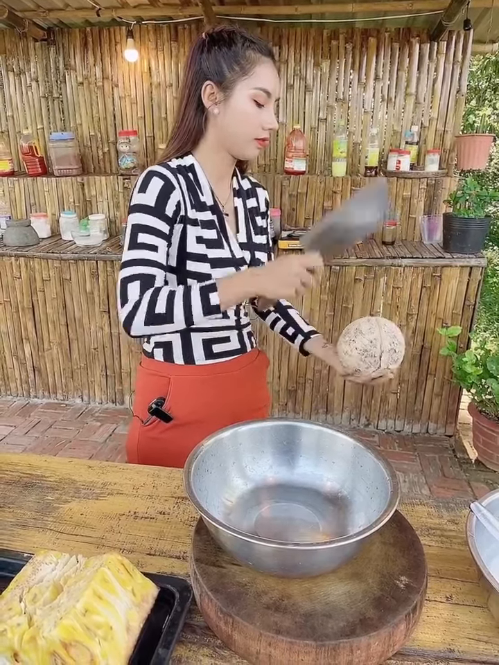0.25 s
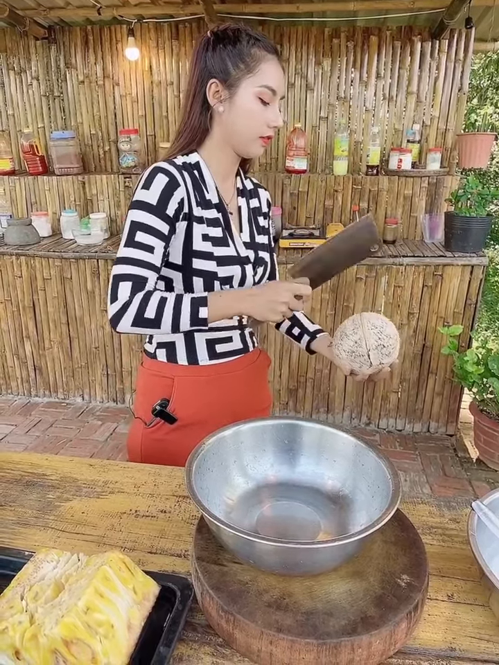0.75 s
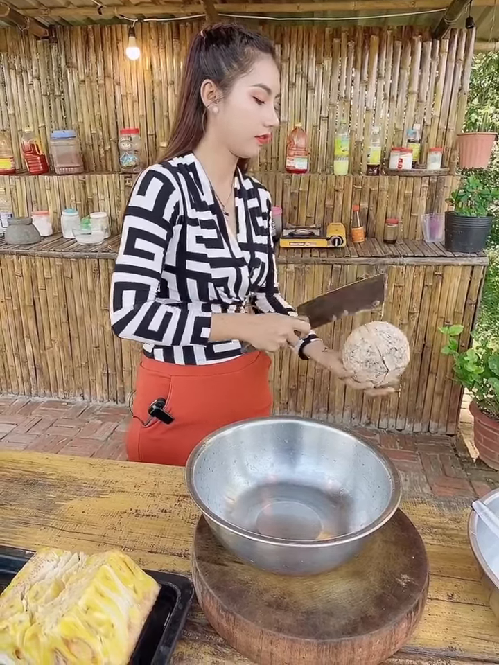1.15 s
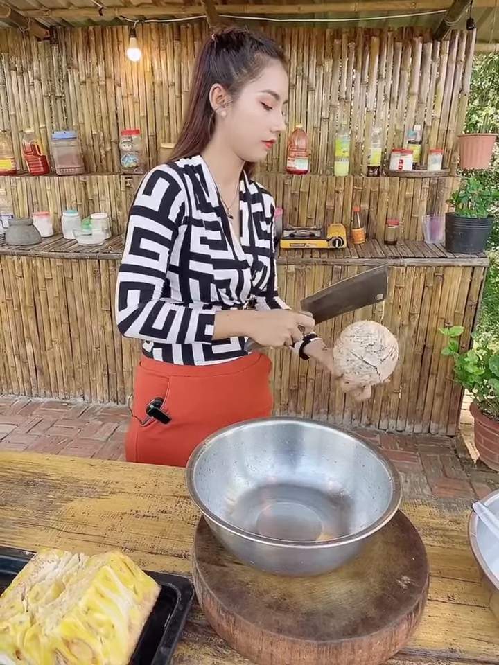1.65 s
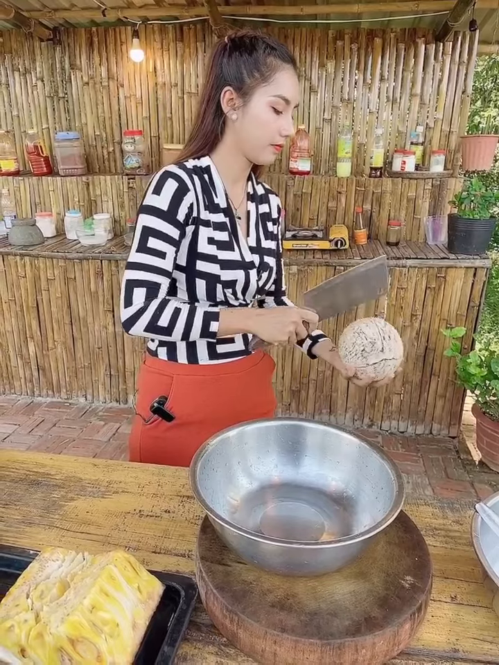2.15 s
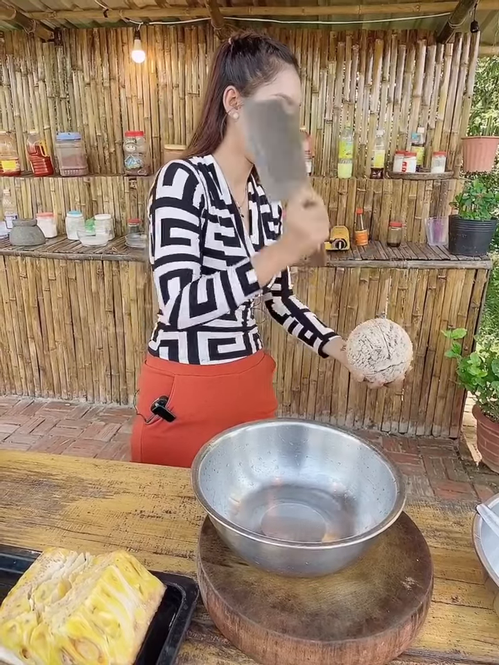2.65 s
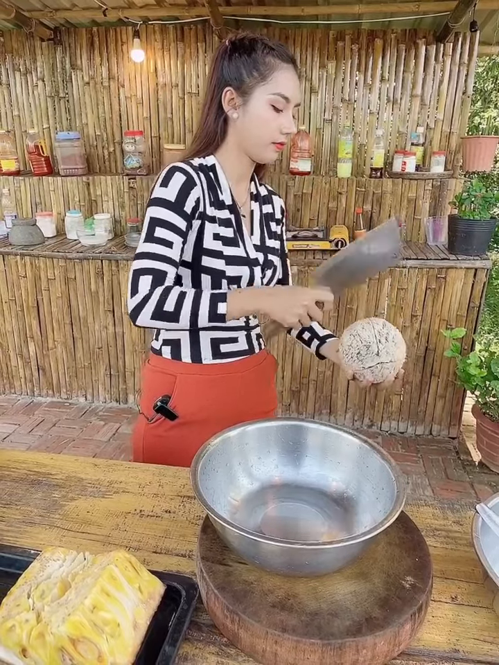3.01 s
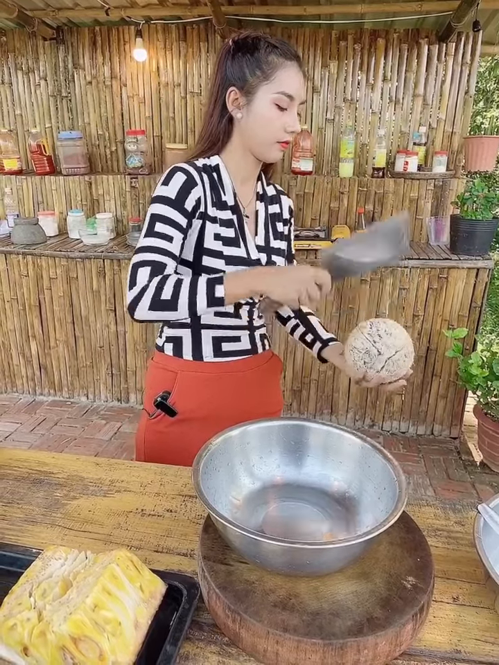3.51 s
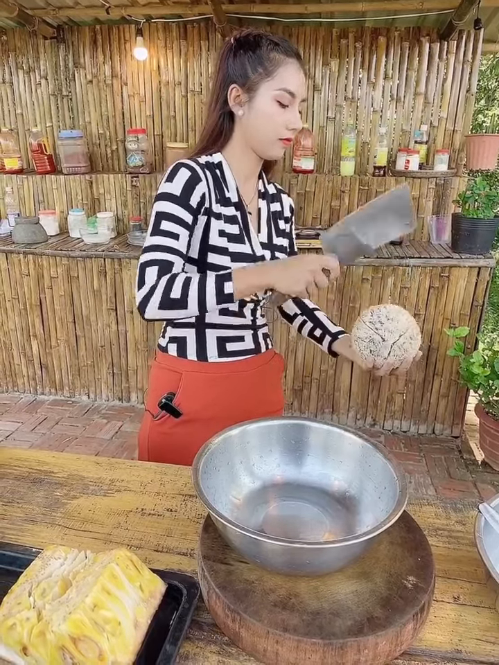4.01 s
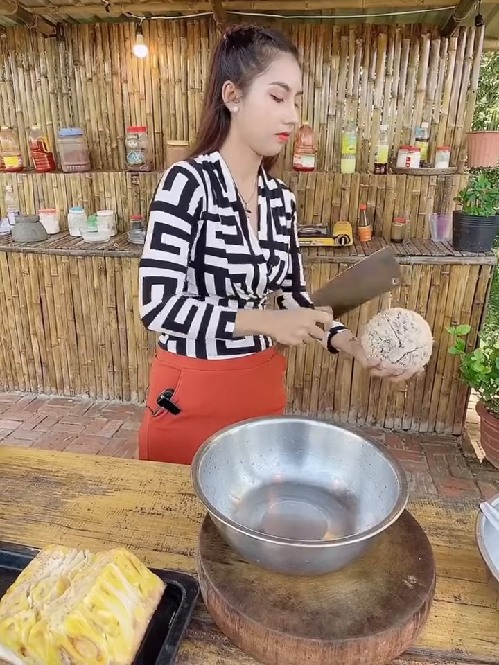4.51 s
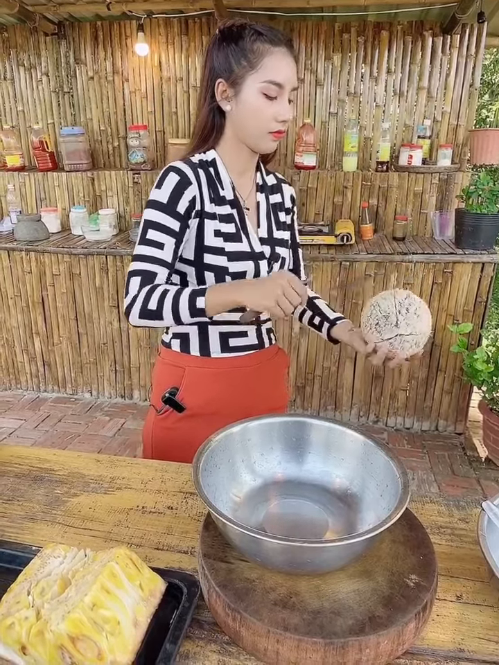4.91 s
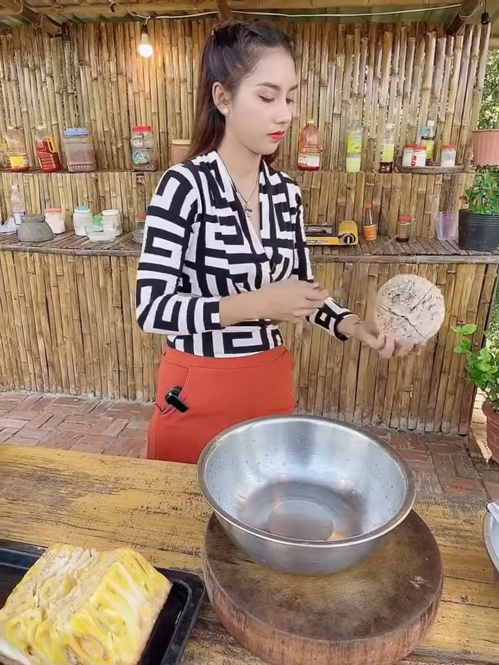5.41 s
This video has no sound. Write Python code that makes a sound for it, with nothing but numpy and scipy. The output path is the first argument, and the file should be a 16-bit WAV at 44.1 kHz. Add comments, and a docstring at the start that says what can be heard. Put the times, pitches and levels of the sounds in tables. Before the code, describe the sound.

A steel cleaver strikes a hand-held coconut six times with sharp, ringing knocks, while a chick peeps faintly in the background.

```python
"""Six sharp knocks with a metallic ring: the back of a steel cleaver strikes a husked, hand-held coconut.
Each blow knocks the shell, sets the blade ringing and echoes in the bamboo shelter of an open kitchen;
the hard ones overload the microphone. Between blows the water inside the nut gurgles, fingers tap
the shell and a chick peeps in the yard, over a faint hiss and a light breeze."""
import sys
import numpy as np
from scipy import signal
from scipy.fft import irfft
from scipy.io import wavfile
from scipy.ndimage import uniform_filter1d

SR = 44100
rng = np.random.default_rng(int(sys.argv[2]) if len(sys.argv) > 2 else 0)


def master_out(mix):
    """Clip the mix to full scale and print it as 16-bit PCM to the path in sys.argv[1]."""
    frames = np.transpose(np.atleast_2d(mix))
    ceiling = np.clip(frames, -1, 1)
    pcm = np.round(ceiling * 32767).astype(np.int16)
    wavfile.write(sys.argv[1], SR, pcm)


N = 249606

# the low rumble of air moving past the microphone: (frequency [Hz], level [dB])
WIND_SPECTRUM = [(10, -3.5), (28, -0.5), (50, -7.5), (90, -8.5), (140, -17), (220, -26.5), (500, -60.5),
                 (2000, -100)]


def gain_of(db):
    """Turns decibels into a factor to multiply a sound by."""
    return 10 ** (np.asarray(db) / 20)


def evened(x):
    """Scales a signal to an average (rms) strength of 1."""
    return x / np.sqrt(np.mean(x ** 2) + 1e-20)


def look_up(points, hz):
    """Reads between the rows of a table, on a scale where all octaves are equally wide."""
    frequencies, values = np.transpose(points)
    return np.interp(np.log(hz + 1), np.log(frequencies + 1), values)


def clock(length_s):
    """The time of every sample, in seconds."""
    return np.arange(int(length_s * SR)) / SR


def add(mix, start_s, sound):
    """Mixes a sound in at a given time, which may lie before the start."""
    at = round(start_s * SR)
    sound = sound[max(-at, 0):]
    part = mix[max(at, 0):][:len(sound)]
    part += sound[:len(part)]


def noise(spectrum, size):
    """Noise of strength 1; the spectrum sets only its balance of low and high."""
    hz = np.fft.rfftfreq(size, 1 / SR)
    random_phases = np.exp(2j * np.pi * rng.random(len(hz)))
    return evened(irfft(gain_of(look_up(spectrum, hz)) * random_phases, size))


def fade(t, t60):
    """Dies away smoothly; t60 is the fade time, the seconds it takes to drop by 60 dB."""
    return np.exp(-np.log(1000) * t / t60)


def ring(tones, t):
    """The fading tones of a struck object; neighbouring tones swing in opposite directions."""
    return sum((-1) ** k * gain_of(db) * fade(t, t60) * np.sin(2 * np.pi * hz * t)
               for k, (hz, db, t60) in enumerate(tones))


def soften(x, cutoff_hz):
    """Turns down the treble, as a longer, softer contact does."""
    pole = np.exp(-2 * np.pi * cutoff_hz / SR)
    return signal.lfilter([(1 - pole) ** 2], [1, -2 * pole, pole ** 2], x)


def by_bite(glancing, full, bite):
    """Blends from the value for a glancing knock (bite 0) to that for a full bite into the shell (1)."""
    return glancing + (full - glancing) * bite


def outdoors(hiss_db=-59.5, breeze_db=-48, gust_db=2.0):
    """A faint even hiss, and a light breeze rumbling at the microphone."""
    # the steady hiss of the open air: (frequency [Hz], level [dB])
    hiss_spectrum = [(88, -24.5), (150, 2.5), (186, -10.5), (264, -5.5), (308, -6.5), (521, -9.5),
                     (1200, -18), (2380, -19), (3870, -21.5), (4880, -23.5), (7210, -24), (8590, -17.5),
                     (10000, -26), (11500, -16), (15700, -43)]
    gusts = noise([(1, 0), (5, -4), (14, -40), (40, -120)], N)
    hiss = gain_of(hiss_db) * noise(hiss_spectrum, N)
    return hiss + gain_of(breeze_db + gust_db * gusts) * noise(WIND_SPECTRUM, N)


def chick(usual_hz=4800, edge_db=70, echo_db=-2, rasp_share=.022):
    """A chick's slightly raspy peeps rise and fall in pitch and echo in the yard."""
    # the peeps: (time of the top [s], top pitch [Hz], level [dB])
    peeps = [(0.236, 4620, -52.5), (0.546, 4790, -50.5), (0.86, 4830, -49), (1.153, 5000, -45.5),
             (1.490, 5010, -46.5), (3.765, 4400, -63), (5.096, 4320, -59.5), (5.416, 4805, -53),
             (5.672, 5020, -49.5)]
    out = np.zeros(N)
    for top_s, top_hz, db in peeps:
        # a higher peep is longer and purer
        length_s = .095 + .00006 * (top_hz - usual_hz)
        octave_db = -13 - 0.0291 * (top_hz - usual_hz)
        from_top = 2 * clock(length_s) / length_s - 1
        droop = .44 * abs(from_top) ** 2.9
        rasp = rasp_share * evened(uniform_filter1d(rng.standard_normal(len(droop)), size=20))
        phase = 2 * np.pi * np.cumsum(top_hz * (1 - droop) * (1 + rasp)) / SR
        # the main tone carries only near the top, the octave above it all along
        voice = gain_of(-edge_db * droop) * np.sin(phase) + gain_of(octave_db) * np.sin(2 * phase)
        add(out, top_s - length_s / 2, gain_of(db) * voice * signal.windows.tukey(len(voice), .3))
    t = clock(.5)
    yard = rng.standard_normal(len(t)) * fade(t, t60=.4)
    return out + gain_of(echo_db) * signal.fftconvolve(out, yard / np.linalg.norm(yard))[:N]


def gurgles():
    """Water moves inside the nut, and each bubble rises in pitch."""
    # the bubbles: (time [s], level [dB], start pitch [Hz], end pitch [Hz], length [s])
    bubbles = [(0.258, -32.5, 527, 560, 0.014), (0.271, -44.5, 657, 800, 0.034)]
    out = np.zeros(N)
    for start_s, db, start_hz, end_hz, length_s in bubbles:
        progress = clock(length_s) / length_s
        cycles = np.cumsum(start_hz + (end_hz - start_hz) * progress) / SR
        swell = np.sin(np.pi * np.sqrt(progress)) ** 2
        add(out, start_s, gain_of(db) * swell * np.sin(2 * np.pi * cycles))
    return out


def touch(t, hz, t60):
    """A light touch makes a short, dull burst of noise around one pitch."""
    spectrum = [(hz / 4, -28), (hz / 1.3, -13), (hz, 0), (hz * 1.3, -11), (hz * 2.5, -22), (hz * 5, -42)]
    return noise(spectrum, len(t)) * fade(t, t60)


def handling(tick_cycles=124, thud_db=-1, brush_s=5.165, brush_db=-47):
    """Taps tick on the shell and thud in the hollow nut; once the blade brushes it and rings faintly."""
    # fingers and blade touching the shell: (time [s], level [dB], tick pitch [Hz])
    taps = [(1.486, -51.5, 2700), (1.872, -49.5, 3195), (1.893, -48, 2560), (1.9163, -49, 5130),
            (1.923, -53, 3237), (2.842, -57, 4000), (3.635, -48.5, 2050), (4.546, -60.5, 3433)]
    out, t = np.zeros(N), clock(0.9)
    for start_s, db, hz in taps:
        tick = touch(t, hz, t60=tick_cycles / hz)
        thud = gain_of(thud_db) * touch(t, hz=532, t60=0.044)
        add(out, start_s, gain_of(db) * (tick + thud))
    steel = blade_note(t, grip=1.3) + gain_of(-12) * blade_overtones(t, favoured_hz=2116)
    add(out, brush_s, gain_of(brush_db) * (1 - fade(t, .15)) * steel)
    return out


def shelter(t, scatter_db=-13, tail_db=-45, tail_t60=0.86, build_s=0.00073):
    """A knock bounces off bamboo walls and roof: many quick echoes, then a faint tail."""
    # the quick echoes: (frequency [Hz], level [dB])
    scatter_spectrum = [(60, -22), (200, -14), (350, 1), (600, -2), (1000, 1.5), (2300, 0), (4000, -2.5),
                        (7000, -13), (11000, -10), (15500, -11)]
    # how long they last: (frequency [Hz], fade time [s])
    scatter_fades = [(100, 0.048), (500, 0.17), (2000, 0.15), (6000, 0.21), (11000, 0.1), (15000, 0.11)]
    # the late tail: (frequency [Hz], level [dB])
    tail_spectrum = [(100, -12.5), (450, 1.5), (1000, -9.5), (2500, -7), (4500, -7), (9000, -12.5),
                     (15000, -20)]
    hz, when, bands = signal.stft(noise(scatter_spectrum, len(t)), SR, nperseg=256)
    bands = bands * fade(when, look_up(scatter_fades, hz)[:, None])
    scatter = signal.istft(bands, SR, nperseg=256)[1][:len(t)]
    tail = noise(tail_spectrum, len(t)) * fade(t, tail_t60)
    return (1 - np.exp(-t / build_s)) * (gain_of(scatter_db) * scatter + gain_of(tail_db) * tail)


def swish(t, swell_s=0.03):
    """The swing's hiss swells as the blade gathers speed and stops when it lands."""
    # air parted by the blade: (frequency [Hz], level [dB])
    swish_spectrum = [(200, -26.5), (450, -10), (620, -5), (800, -12.5), (1500, -26), (6000, -33.5)]
    return noise(swish_spectrum, len(t)) * np.exp(-(t / swell_s) ** 2)[::-1]


def air_puff(t, rise_s=0.0068):
    """A blow pushes a deep puff of air at the microphone."""
    rumble = soften(noise(WIND_SPECTRUM, len(t)), cutoff_hz=50)
    return rumble * (1 - np.exp(-t / rise_s)) * fade(t, t60=.5)


def blade_note(t, grip, hz=1728.5, t60=.55, first_swing=0.7, contact_t60=0.19):
    """The blade bends to and fro; its main note fades fastest while the steel still lies on the shell."""
    return ring([(hz, 0, t60 * grip)], t) * (1 + first_swing * fade(t, contact_t60))


def blade_whistle(t):
    """Two higher tones of the bending blade lie so close together that their sum wavers."""
    # the close pair: (pitch [Hz], level [dB], fade time [s])
    whistle_tones = [(5181, 0, .32), (5190, -3, .32)]
    return ring(whistle_tones, t)


def blade_overtones(t, favoured_hz, favour_db=9):
    """The spot where the blade is struck makes one of its many tones stand out."""
    # the blade's other tones: (pitch [Hz], level [dB], fade time [s])
    steel_tones = [(1213, -6, .17), (2116, -9, .21), (4538, -11, .21), (6660, -18, .18), (8110, -9, .15),
                   (8877, -2, .1), (9166, -8, .13), (10162, -10, .21), (10742, -6, .13), (10852, -4, .15),
                   (11390, -29, .55), (12920, -8, .11), (13610, -6, .11)]
    nearest_hz = min(steel_tones, key=lambda tone: abs(tone[0] - favoured_hz))[0]
    return ring([(hz, db + favour_db * (hz == nearest_hz), t60) for hz, db, t60 in steel_tones], t)


def crack(t, t60, snaps_per_s=1200, snap_t60=0.0016):
    """Fibres of the shell snap in a quickly dying burst."""
    # the snapping fibres: (frequency [Hz], level [dB])
    crack_spectrum = [(300, -27), (1200, 2), (3000, 2), (6000, -1.5), (10500, -3), (15500, -19)]
    snaps = rng.exponential(1, len(t)) * (rng.random(len(t)) < snaps_per_s / SR)
    bursts = signal.fftconvolve(snaps, fade(clock(.02), snap_t60))[:len(t)]
    return evened(bursts + .5) * noise(crack_spectrum, len(t)) * fade(t, t60)


def knock(t, bite, bright_hz, bass_limit_hz):
    """The hollow nut knocks, the steel clacks and the kitchen answers."""
    # the nut, muffled by the hand: (pitch [Hz], level [dB], fade time [s])
    shell_tones = [(405, -10, 0.039), (869, -11, 0.022), (1293, -16, 0.032), (1650, -9.5, 0.006),
                   (2052, -7.5, .022), (2470, -6, 0.015), (3243, -8.5, 0.015), (4340, -14, 0.0097),
                   (463, -36, 0.28)]
    # blade tones that the shell chokes at once: (pitch [Hz], level [dB], fade time [s])
    clack_tones = [(2277, 0.5, 0.096), (2710, 0.5, 0.065), (2910, 2.5, 0.079), (3580, -3, 0.087),
                   (3870, -2, .09)]
    # hollow tones of bench, bowl and shelter: (pitch [Hz], level [dB], fade time [s])
    kitchen_tones = [(318, -17, .2), (345, -22, .19), (463, -22, .21), (542, -20, .19), (618, -18, .15),
                     (767, -24, .21), (1055, -28, .18), (1150, -29, .15), (1515, -28, .18)]
    echo = gain_of(by_bite(-18, 0.5, bite)) * shelter(t)
    hollow = gain_of(by_bite(-25.5, -3.5, bite)) * ring(kitchen_tones, t)
    clack = gain_of(by_bite(-27, -23, bite)) * ring(clack_tones, t)
    struck = soften(ring(shell_tones, t) + clack + echo + hollow, bright_hz)
    # a body as small as a nut sends out little bass
    return signal.sosfilt(signal.butter(3, bass_limit_hz, "high", fs=SR, output="sos"), struck)


def cleaver_blows(soft_blow_hz=350, bright_hz_per_db=590):
    """The cleaver swings and lands; a deeper bite cracks louder and longer and moves more air."""
    # the blows; the first lands before the start, and the force adds to the three blade levels:
    # (time [s], force [dB], bite [0-1], bass limit [Hz], note [dB], whistle [dB], overtones [dB],
    # favoured overtone [Hz], grip [factor on the note's fade time])
    blows = [(-0.27, 11.5, 1, 250, -28.5, -42, -42, 10162, 1.08),
             (0.7065, 11.5, 0.92, 410.6, -14.5, -29.5, -31, 10162, 0.86),
             (2.456, 6, 0.25, 281, -27.5, -43, -35, 8110, 0.66),
             (2.896, 9.5, 0.98, 259.7, -25, -28, -17, 9166, 0.83),
             (3.2855, 1, 0.03, 200, -27.5, -60, -28, 9166, 0.93),
             (3.9542, 9, 1, 221.4, -22, -27, -26, 10852, 0.92),
             (4.6372, 8.5, 0.91, 180.4, -24, -53, -24, 10852, 1.3)]
    out, t = np.zeros(N), clock(1)
    for hit_s, force_db, bite, bass_hz, note_db, whistle_db, overtones_db, favoured_hz, grip in blows:
        # a harder blow makes a shorter, brighter contact
        bright_hz = soft_blow_hz + bright_hz_per_db * max(force_db, 0)
        nut = knock(t, bite, bright_hz, bass_hz)
        split = gain_of(by_bite(-30, -11.5, bite)) * crack(t, t60=by_bite(0.051, .115, bite))
        puff = gain_of(by_bite(-52, -31, bite)) * air_puff(t)
        blade = (gain_of(note_db) * blade_note(t, grip)
                 + gain_of(whistle_db) * blade_whistle(t)
                 + gain_of(overtones_db) * soften(blade_overtones(t, favoured_hz), 3 * bright_hz))
        add(out, hit_s, gain_of(force_db) * (nut + split + blade + puff))
        add(out, hit_s - 1, gain_of(force_db + by_bite(-74.5, -57.5, bite)) * swish(t))
    return out


def scene():
    """All the sounds meet at one microphone."""
    return (cleaver_blows() + gurgles() + handling() + chick() + outdoors())[None]


def record(dry):
    """Hard blows overload the microphone and lose their peaks; then the highest treble is cut away."""
    clipped = np.clip(dry, -1, 1)
    treble_cut = signal.firwin(511, cutoff=15850, window=("kaiser", 9), fs=SR)
    return signal.oaconvolve(clipped, treble_cut[None], "same")


dry = scene()
out = record(dry)
master_out(out)
```